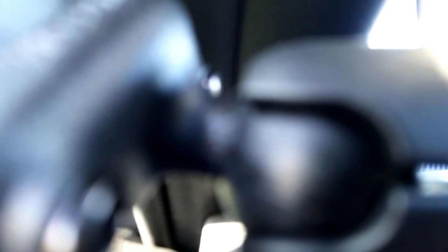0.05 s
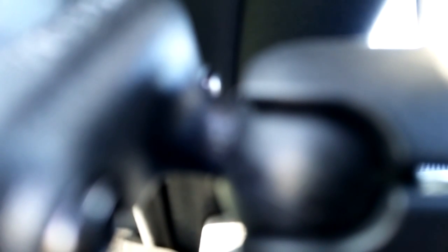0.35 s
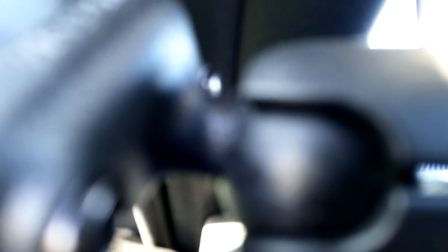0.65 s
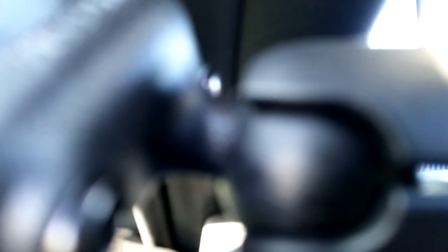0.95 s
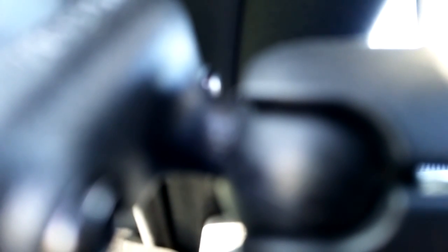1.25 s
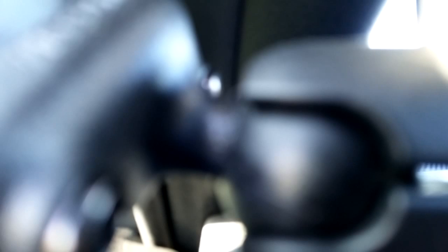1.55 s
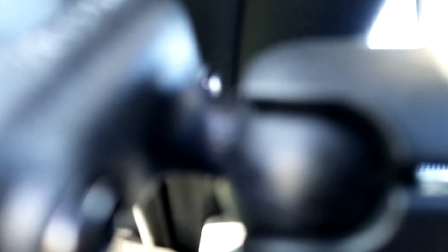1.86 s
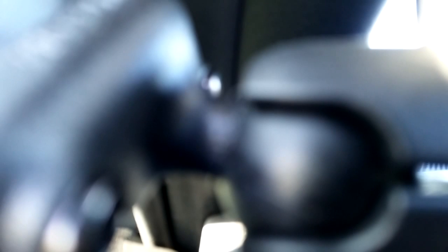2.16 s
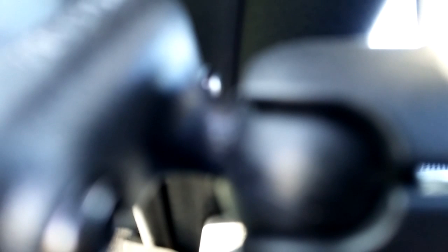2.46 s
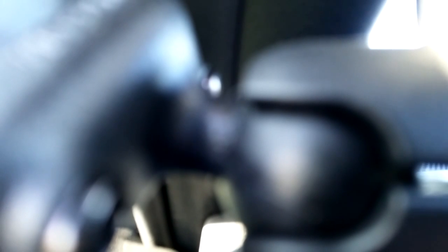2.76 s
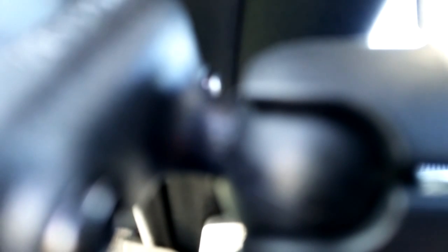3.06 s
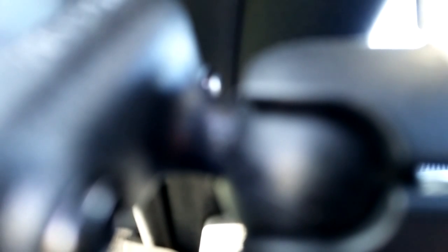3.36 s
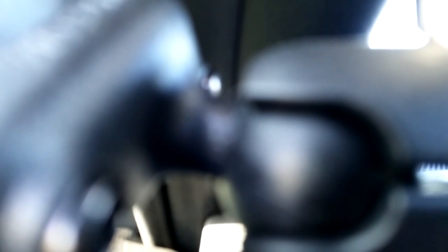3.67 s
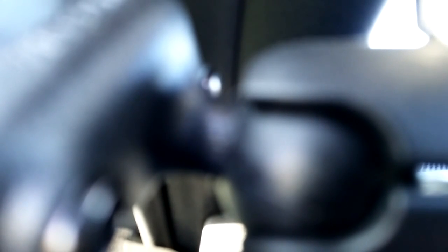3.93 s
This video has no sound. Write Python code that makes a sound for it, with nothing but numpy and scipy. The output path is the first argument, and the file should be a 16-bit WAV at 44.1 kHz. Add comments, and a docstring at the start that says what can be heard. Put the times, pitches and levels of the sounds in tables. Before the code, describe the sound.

A four-cylinder car engine idles with a low rumble, is revved into a booming drone, holds briefly, then drops back with a burble. Heard from inside the parked car, with faint ticks, small clicks and thin insect hiss outside.

```python
"""Revving a parked car

From inside, a four-cylinder engine idles, is revved and held, then drops back with a burble.
Its firings make a boom and a drone, pulse the rushing gas and ring the exhaust and intake.
Something ticks just before the rev, with a faint whirr; the cabin adds small clicks and a rustle.
Outside, insects keep up a thin high hiss and one of them chirps."""
import sys
import numpy as np
from scipy import signal
from scipy.fft import rfft, irfft
from scipy.io import wavfile
from scipy.ndimage import uniform_filter1d

SR = 44100
rng = np.random.default_rng(int(sys.argv[2]) if len(sys.argv) > 2 else 0)


def wav_record(signal):
    """Record a signal, one row per channel, as 16-bit PCM in the file named by sys.argv[1]."""
    frames = np.transpose(np.atleast_2d(signal))
    bounded = np.clip(frames, -1, 1)
    # unit amplitude maps onto the largest positive 16-bit level
    quanta = np.round(bounded * 32767).astype(np.int16)
    wavfile.write(sys.argv[1], SR, quanta)


N = 176400
T = np.arange(N) / SR
FREQS = np.fft.rfftfreq(N, 1 / SR)
WAVER_HZ = 11  # how fast the engine and the whirr waver


def amp(db):
    """Turns decibels into a gain."""
    return 10 ** (np.asarray(db) / 20)


def unit(x):
    """Scales a sound to an average power of 1."""
    return x / np.sqrt(np.mean(abs(x) ** 2) + 1e-20)


def curve(table, column=1):
    """One column of a table, joined by straight lines in time."""
    table = np.array(table)
    return np.interp(T, table[:, 0], table[:, column])


def colour(spectrum, hz):
    """Gain of a spectrum at the given frequencies."""
    points_hz, db = np.transpose(spectrum)
    return amp(np.interp(np.log(hz + 1), np.log(points_hz), db))


def shaped(x, spectrum):
    """Filters a sound by a spectrum that falls away beyond its ends."""
    low_cut = np.minimum(FREQS / spectrum[0][0], 1) ** 2
    high_cut = np.minimum(spectrum[-1][0] / (FREQS + 1), 1) ** 2
    return unit(irfft(rfft(x) * colour(spectrum, FREQS) * low_cut * high_cut, N))


def noise(spectrum):
    """Noise with a given spectrum."""
    return shaped(rng.standard_normal(N), spectrum)


def resonance(x, hz, width_hz):
    """Lets a sound ring around one frequency, at a power of 1."""
    return unit(irfft(rfft(x) / (1 + 1j * (FREQS - hz) / (width_hz / np.sqrt(2))) ** 2, N))


def drift(rate_hz, points=4000):
    """A smooth random wobble; its real and imaginary parts wander separately."""
    draws = rng.standard_normal((points, 2)) @ [1, 1j]
    hz = np.fft.fftfreq(points, N / SR / points)
    wobble = np.fft.ifft(draws * np.exp(-(hz / rate_hz) ** 2))
    return unit(np.interp(T, np.linspace(0, N / SR, points), wobble))


def swell(start, rise):
    """Rises to 1 in the given time, then dies away."""
    age = np.clip((T - start) / rise, 0, 50)
    return age * np.exp(1 - age)


def bursts(events, spectrum, length_s):
    """Short dry bursts of noise that peak at the listed times."""
    rise = length_s / 2
    return noise(spectrum) * sum(amp(db) * swell(time - rise, rise) for time, db in events)


def grainy(spectrum, levels, grain_db=3):
    """Flickering noise that follows a level curve."""
    return unit(noise(spectrum) * amp(grain_db * drift(rate_hz=40).real)) * amp(curve(levels))


# Tone of the background (frequency [Hz], gain [dB])
AIR_SPECTRUM = [(200, 7), (450, -3), (700, -8.5), (1100, -4.5), (1900, -20), (2800, -21), (5000, -30.5),
                (12000, -40.5), (17000, -35)]


def air(level_db=-56):
    """A soft, steady background rush."""
    return amp(level_db) * noise(AIR_SPECTRUM)


# Tone of the insect chorus (frequency [Hz], gain [dB])
CHORUS_SPECTRUM = [(7000, -32), (8900, -12), (10250, 0), (10600, -7), (11800, -26)]


def insects(chorus_db=-65.5, chirp_db=-72.5, chirp_hz=8520, chirp_s=.055, pulses_per_s=140):
    """A steady high chorus and one nearer insect's pulsed chirps."""
    gaps = .196 + .044 * np.exp(-np.arange(13) / 2.2)  # seconds; the chirps speed up, then settle
    starts = .145 + np.cumsum(gaps) - gaps
    arches = sum(np.sqrt(np.maximum(1 - (2 * (T - start) / chirp_s - 1) ** 2, 0)) for start in starts)
    tone = (drift(rate_hz=130) * np.exp(2j * np.pi * chirp_hz * T)).real
    trill = unit(tone * (1 + np.cos(2 * np.pi * pulses_per_s * T)))
    return amp(chirp_db) * arches * trill + amp(chorus_db) * noise(CHORUS_SPECTRUM)


# How loud the rustle is (time [s], level [dB])
RUSTLE_LEVELS = [(0, -84.5), (2.891, -75), (2.96, -65), (3.1, -64.5), (3.55, -75.5)]
# Tone of the rustle and the crackle (frequency [Hz], gain [dB])
RUSTLE_SPECTRUM = [(2000, 5.5), (4500, -5), (7500, 2), (17000, -12)]


def rustle():
    """A light rustle in the cabin, loudest as the engine drops back."""
    return grainy(RUSTLE_SPECTRUM, RUSTLE_LEVELS)


def crackle(ticks_per_s=45, level_db=-80):
    """Faint stray ticks in the cabin: tiny soft bursts of random size."""
    sizes = np.sqrt(rng.exponential(size=N)) * (rng.random(N) < ticks_per_s / SR)
    return amp(level_db) * unit(noise(RUSTLE_SPECTRUM) * uniform_filter1d(sizes, size=64))


# Each click (time [s], level [dB])
CLICK_EVENTS = [(2.1133, -64.5), (2.5374, -62)]
# Tone of a click (frequency [Hz], gain [dB])
CLICK_SPECTRUM = [(4800, 3), (7500, 13), (10000, -3)]


def clicks():
    """Two small, bright clicks in the cabin."""
    return bursts(CLICK_EVENTS, CLICK_SPECTRUM, length_s=.0058)


# Each knock (time [s], level [dB])
KNOCK_EVENTS = [(1.34, -48), (1.772, -37.5)]
# Tone of a knock (frequency [Hz], gain [dB])
KNOCK_SPECTRUM = [(280, 8), (640, -5), (850, -19)]


def knocks():
    """Two dull knocks."""
    return bursts(KNOCK_EVENTS, KNOCK_SPECTRUM, length_s=.015)


# Each tick (time [s], level [dB])
TICK_EVENTS = [(1.3672, -58), (1.4091, -56), (1.451, -53.5), (1.4922, -56), (1.618, -58.5), (1.658, -55),
               (1.6983, -55), (1.7366, -55.5)]
# Tone of a tick (frequency [Hz], gain [dB])
TICK_SPECTRUM = [(4500, -12), (9000, -5), (11500, 1), (13400, -15)]


def ticks():
    """Sharp ticks just before the rev, at the pace of the idle firings."""
    return bursts(TICK_EVENTS, TICK_SPECTRUM, length_s=.0017)


# How loud the hiss is (time [s], level [dB])
HISS_LEVELS = [(0, -86), (.9, -78.5), (1.5, -66), (1.94, -66), (2.04, -74.5)]
# Tone of the hiss (frequency [Hz], gain [dB])
HISS_SPECTRUM = [(1640, 4), (2050, -5), (3000, -7.5), (3500, -5.5), (4100, -8.5), (5600, -9.5),
                 (6800, -17.5)]


def hiss():
    """An airy hiss that grows before the rev."""
    return grainy(HISS_SPECTRUM, HISS_LEVELS)


def thin_tone(hz=819, start_db=-66, fade_db_per_s=17.5):
    """A thin tone dying away at the start."""
    return np.sqrt(2) * amp(start_db - fade_db_per_s * T) * np.sin(2 * np.pi * hz * T)


# How loud the whirr is (time [s], level [dB])
WHIRR_LEVELS = [(.9, -90), (1.65, -70.5), (2.05, -75), (2.5, -70.5), (2.7, -90.5)]


def whirr(start_hz=2450, sag_hz_per_s=300, patchy_db=3):
    """A faint, patchy whirr whose pitch sinks from the rev on."""
    hz = start_hz - sag_hz_per_s * np.maximum(T - 2, 0)
    tone = (drift(rate_hz=150) * np.exp(2j * np.pi * np.cumsum(hz) / SR)).real
    patches = amp(patchy_db * drift(WAVER_HZ).real)
    return unit(tone * patches) * amp(curve(WHIRR_LEVELS))


def groan(start_s=1.68, hz=98, sag_per_s=.3, harmonic_db=-59.5):
    """A short groan as the throttle opens: four harmonics of a low, sinking pitch."""
    turns = np.cumsum(hz * np.exp(-sag_per_s * (T - start_s))) / SR
    harmonics = sum(np.cos(2 * np.pi * (k * turns + rng.random())) for k in (5, 6, 8, 9))
    return amp(harmonic_db) * swell(start_s, rise=.045) * harmonics


# How hard the car shakes (time [s], level [dB])
SHAKE_LEVELS = [(1.08, -44), (1.2, -34), (1.66, -37.5), (1.8, -18), (2.15, -30), (2.42, -26.5),
                (3.02, -33.5), (3.1, -17.5), (3.4, -31.5)]
# Tone of the shaking (frequency [Hz], gain [dB])
SHAKE_SPECTRUM = [(16, -8), (27, 5), (140, -7.5), (200, -25.5), (400, -44.5)]


def body_shake():
    """The car's body shakes with a deep rumble."""
    return noise(SHAKE_SPECTRUM) * amp(curve(SHAKE_LEVELS))


# Each exhaust thud (time [s], level [dB])
THUD_EVENTS = [(1.123, -30), (1.194, -21.5), (2.384, -15.5), (2.508, -21.5), (3.064, -8), (3.228, -11),
               (3.642, -17)]


def exhaust_thuds(hz=58.5, rise_s=.012):
    """Low thuds: stumbles at idle and pops as the throttle shuts."""
    return sum(amp(db) * swell(start, rise_s) * np.sin(2 * np.pi * hz * (T - start))
               for start, db in THUD_EVENTS)


def cylinder_buzz(phase, cylinders=4):
    """A rough buzz that repeats once all the cylinders have fired."""
    cycle = irfft(np.exp(2j * np.pi * rng.random(256)))
    position = phase / (2 * np.pi * cylinders) % 1
    return np.sqrt(curve(FIRINGS)) * np.interp(position, np.linspace(0, 1, len(cycle)), cycle)


# How loud the gas rushes as the throttle opens and shuts (time [s], level [dB])
THROTTLE_LEVELS = [(0, -67), (1.65, -59.5), (2.12, -47), (2.23, -36.5), (2.33, -35), (2.42, -49),
                   (2.6, -45.5), (2.84, -40.5), (3.18, -44), (3.5, -52.5)]
# Tone of the gas (frequency [Hz], gain [dB])
GAS_SPECTRUM = [(150, 3.5), (290, 0.5), (400, -9.5), (760, -18.5), (1280, -24), (1480, -34.5)]


def gas_roar(phase, rasp=1.5, pulsing=.5):
    """Rushing, rasping gas, pulsed by each firing."""
    gas = unit(noise(GAS_SPECTRUM) + rasp * shaped(cylinder_buzz(phase), GAS_SPECTRUM))
    return unit(gas * (1 + pulsing * np.cos(phase))) * amp(curve(THROTTLE_LEVELS))


# How loud the exhaust growls (time [s], level [dB])
GROWL_LEVELS = [(2.05, -68), (2.21, -39.5), (2.55, -38), (2.62, -42), (3.2, -48), (3.5, -56)]
# Where the intake rings (frequency [Hz], width [Hz], level at full throttle [dB])
BARK_RESONANCES = [(545, 100, -44), (1201.3, 105, -54)]


def growl_and_bark(phase, bark_db_per_throttle_db=1.61):
    """Unequal cylinders ring the exhaust's growl and, at wide throttle, the intake's bark."""
    buzz, throttle_db = cylinder_buzz(phase), curve(THROTTLE_LEVELS)
    growl = resonance(buzz, hz=242, width_hz=65) * amp(curve(GROWL_LEVELS))
    bark = sum(amp(db) * resonance(buzz, hz, width) for hz, width, db in BARK_RESONANCES)
    return growl + bark * amp(bark_db_per_throttle_db * (throttle_db - throttle_db.max()))


# How fast and loud the engine runs
# (time [s], firing rate [Hz], firing tone [dB], its octave [dB], base level of other overtones [dB])
FIRINGS = [(0, 24.46, -33, -45, -38), (1.66, 24.5, -29, -49, -36), (1.72, 19.2, -29, -22.5, -36),
           (1.78, 32.8, -14, -15.5, -35), (1.86, 44, -21, -23.5, -42), (1.95, 66.6, -9.5, -24.5, -47),
           (2.09, 78, -12.5, -29.5, -47), (2.17, 100.3, -20.5, -50, -44), (2.22, 103.6, -15, -37, -41),
           (2.32, 120, -25, -37.5, -40), (2.42, 111, -25.5, -50.5, -50), (2.56, 91, -24.5, -56, -52),
           (2.68, 101.6, -17.5, -45, -44), (2.85, 106.5, -19, -39, -41), (3.04, 102.8, -16, -40, -43),
           (3.08, 99.4, -26, -49.5, -52), (3.25, 85, -24, -50, -51), (3.4, 63, -18, -61, -56),
           (3.57, 49.4, -25.5, -37, -52), (4, 51.6, -28, -33.5, -50)]
# How the cabin boosts or dulls those other overtones (frequency [Hz], gain [dB])
CABIN_RESPONSE = [(70, 0), (95, -10), (120, -4.5), (150, -6.5), (215, 2), (320, -2), (400, -13), (540, -1),
                  (700, -7.5)]


def engine_boom(phase):
    """The firings blend into a deep tone, with its octave and third harmonic."""
    tone = amp(curve(FIRINGS, column=2)) * np.cos(phase)
    octave = amp(curve(FIRINGS, column=3)) * np.cos(2 * phase)
    cabin_gain = colour(CABIN_RESPONSE, 3 * curve(FIRINGS))
    third = amp(curve(FIRINGS, column=4)) * cabin_gain * np.cos(3 * phase)
    return np.sqrt(2) * (third - tone - octave)


def engine_drone(phase, waver_depth=.25):
    """Wavering multiples of the firing rate fill the cabin; unequal cylinders add in-between ones."""
    rate, drone = curve(FIRINGS), np.zeros(N)
    idling = 1 - (rate - rate.min()) / np.ptp(rate)  # 1 at the slowest, 0 at the fastest
    between_db = -4.5 - 17 * idling
    fall_db = 4 - .5 * idling  # lost with each harmonic above the third
    for multiple in np.r_[.5, 1.5, 2.5, 4:11]:
        share = amp(between_db if multiple % 1 else -fall_db * (multiple - 3))
        waver = waver_depth * drift(WAVER_HZ)
        tone = np.cos(multiple * (phase + waver.imag / 2) + 2 * np.pi * rng.random())
        drone += share * colour(CABIN_RESPONSE, multiple * rate) * (1 + waver.real) * tone
    return np.sqrt(2) * drone * amp(curve(FIRINGS, column=4))


def firing_phase(jitter=.005):
    """An angle that turns once per firing, with a slightly unsteady crank."""
    rate = curve(FIRINGS) * (1 + jitter * drift(WAVER_HZ).real)
    return 2 * np.pi * np.cumsum(rate) / SR


def scene():
    """Adds the engine, the small sounds and the background into one channel."""
    phase = firing_phase()
    engine = engine_boom(phase) + engine_drone(phase) + gas_roar(phase) + growl_and_bark(phase)
    engine += whirr() + thin_tone() + exhaust_thuds() + body_shake()
    small_sounds = ticks() + clicks() + knocks() + groan()
    background = rustle() + hiss() + air() + crackle() + insects()
    return (engine + small_sounds + background)[None]


def record(dry, fade_s=.006, cutoff_hz=17000):
    """Fades both ends and cuts the highest treble."""
    to_nearest_end = np.minimum(T, T[::-1])
    fade = np.sin(np.pi / 2 * np.minimum(to_nearest_end / fade_s, 1)) ** 2
    low_pass = signal.firwin(511, cutoff_hz, window=("kaiser", 9), fs=SR)
    return signal.oaconvolve(dry * fade, low_pass[None], "same")


dry = scene()
out = record(dry)
wav_record(out)
```